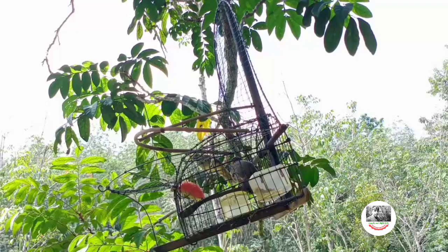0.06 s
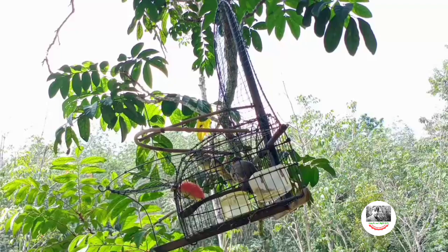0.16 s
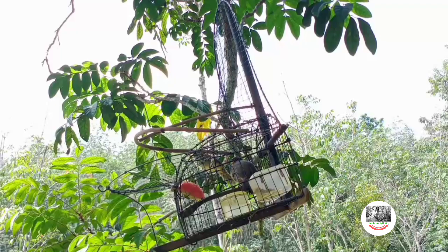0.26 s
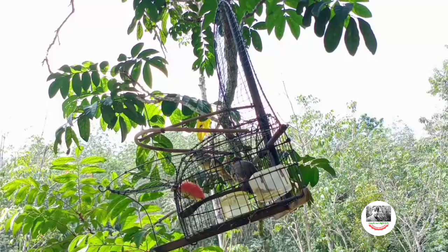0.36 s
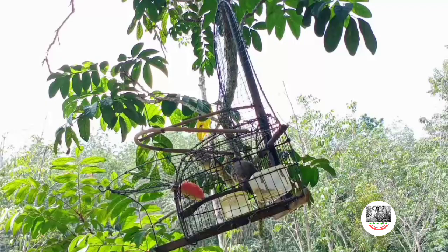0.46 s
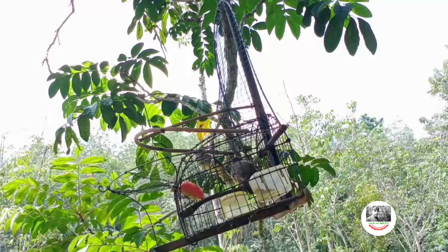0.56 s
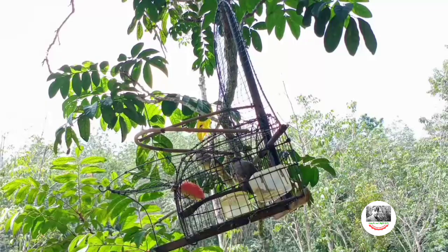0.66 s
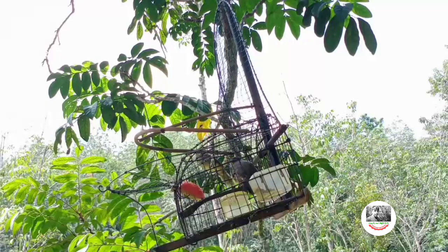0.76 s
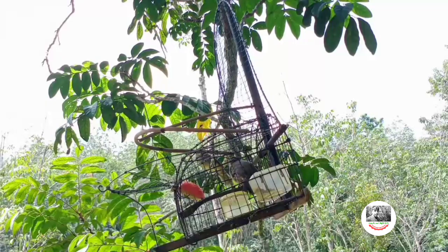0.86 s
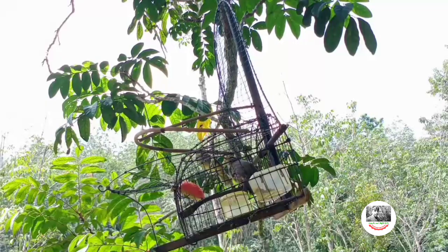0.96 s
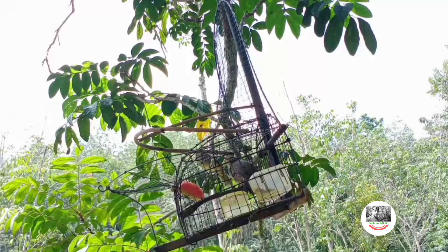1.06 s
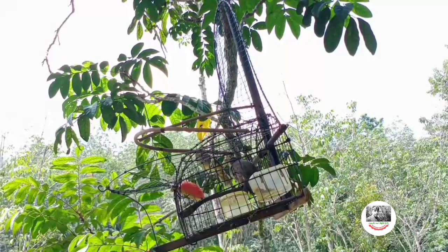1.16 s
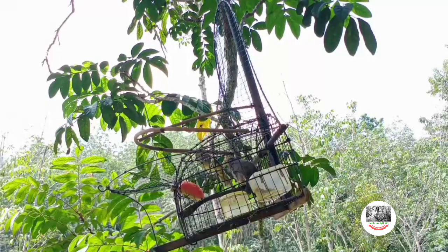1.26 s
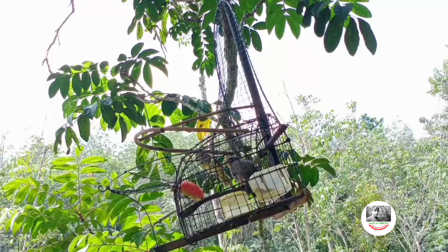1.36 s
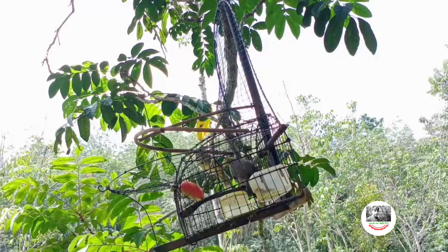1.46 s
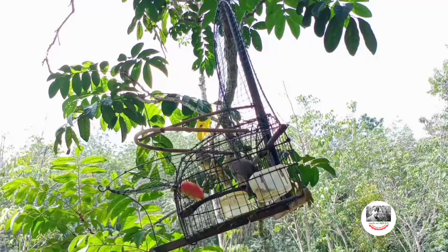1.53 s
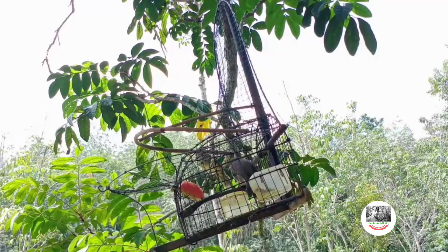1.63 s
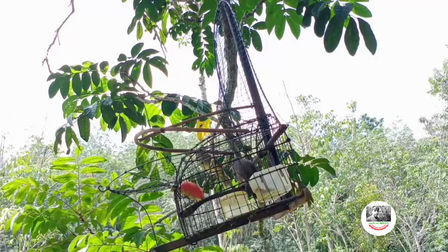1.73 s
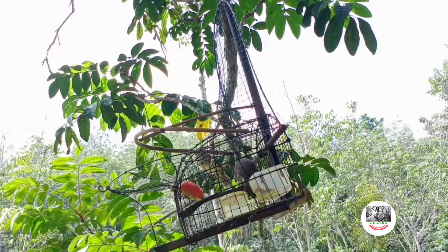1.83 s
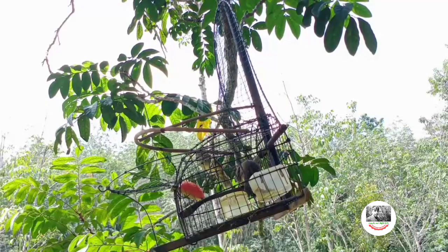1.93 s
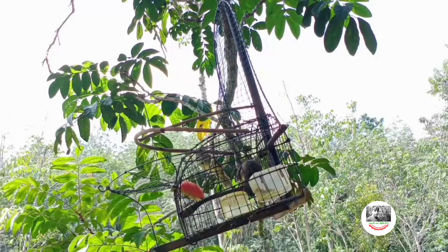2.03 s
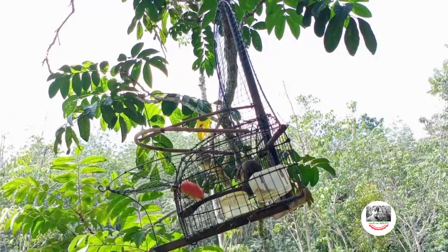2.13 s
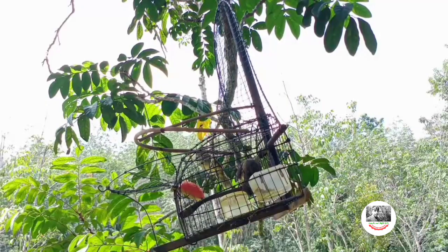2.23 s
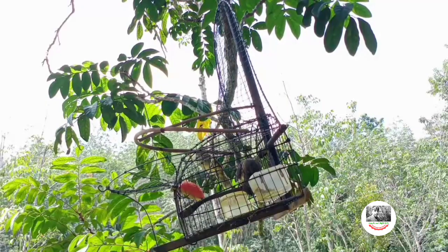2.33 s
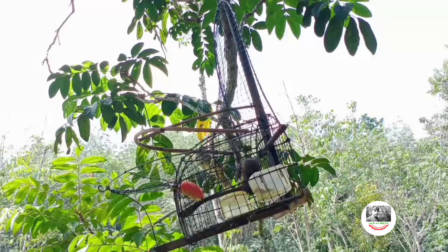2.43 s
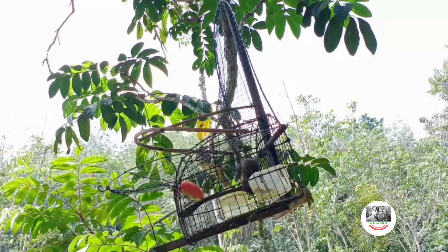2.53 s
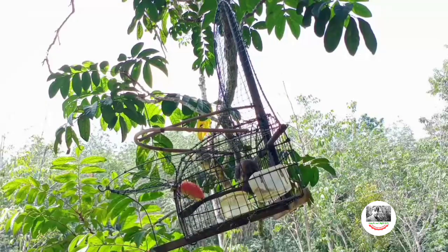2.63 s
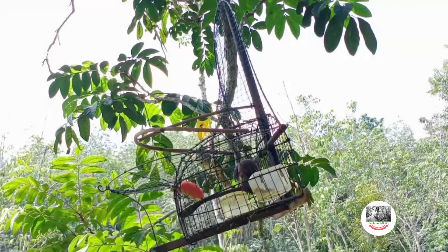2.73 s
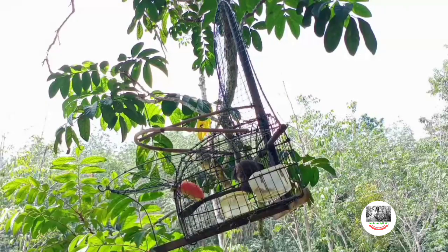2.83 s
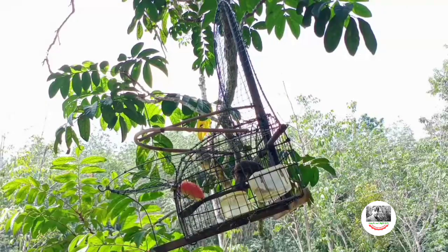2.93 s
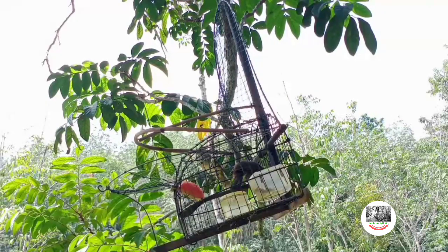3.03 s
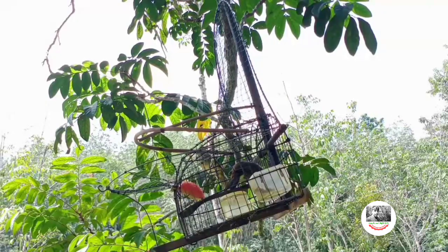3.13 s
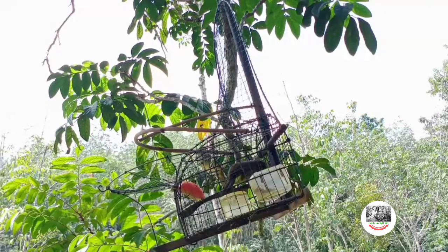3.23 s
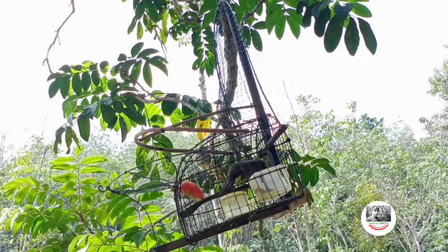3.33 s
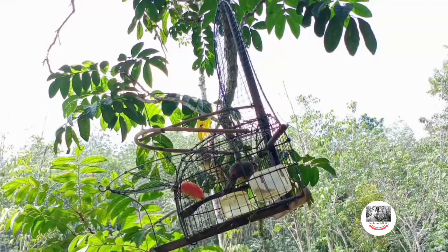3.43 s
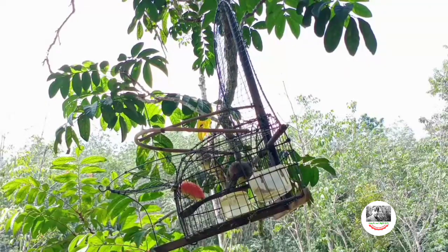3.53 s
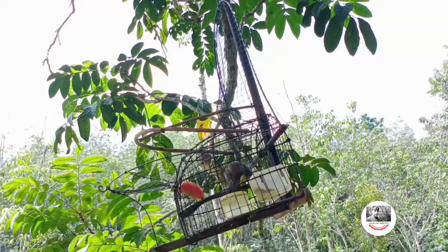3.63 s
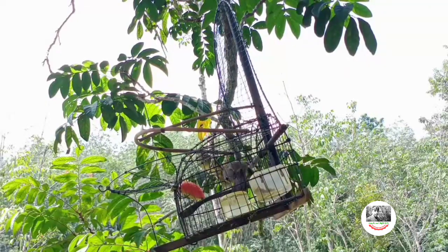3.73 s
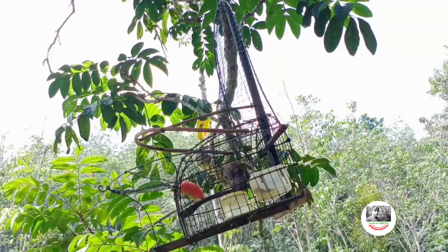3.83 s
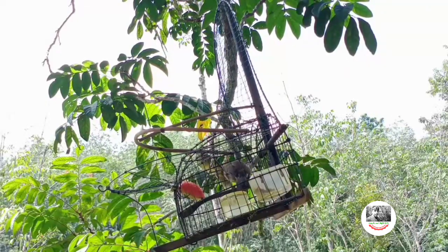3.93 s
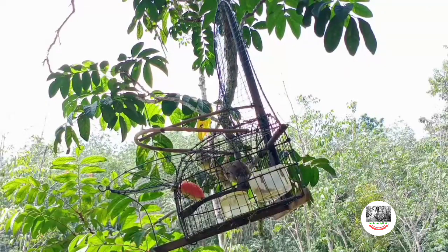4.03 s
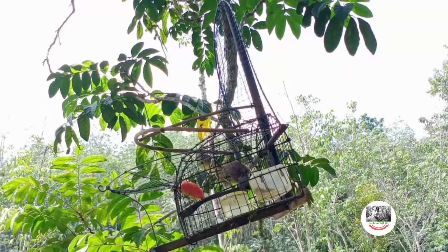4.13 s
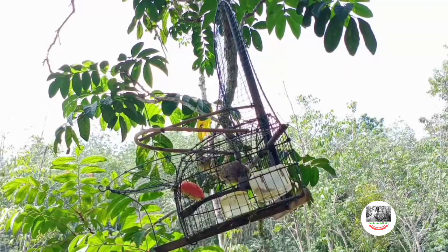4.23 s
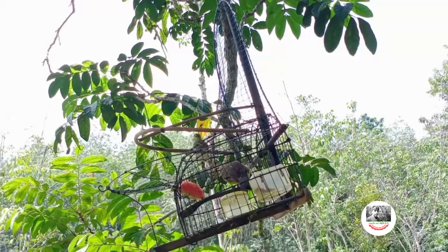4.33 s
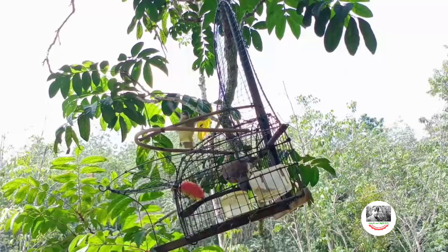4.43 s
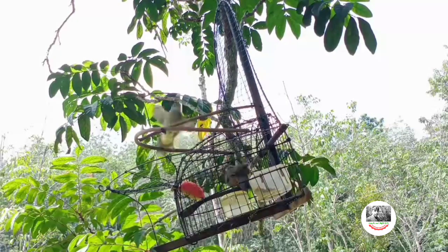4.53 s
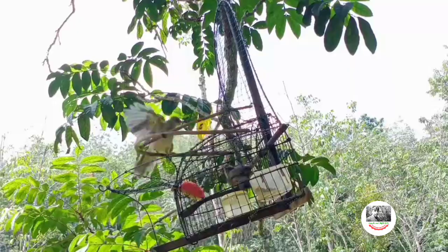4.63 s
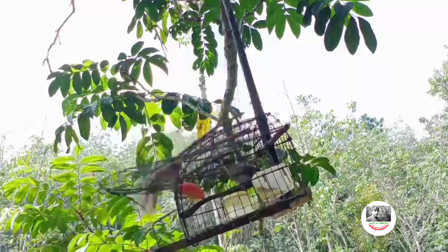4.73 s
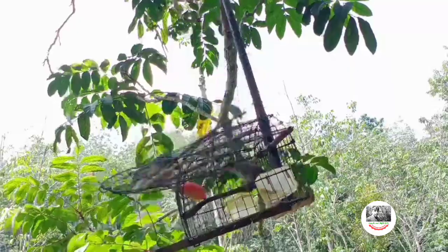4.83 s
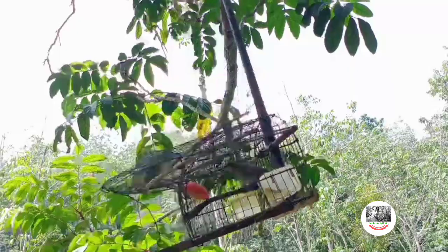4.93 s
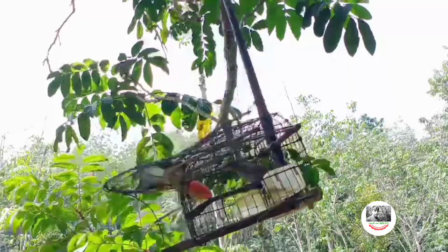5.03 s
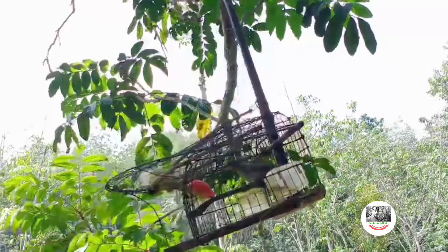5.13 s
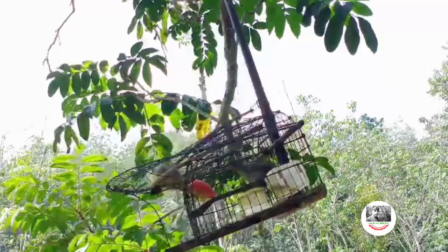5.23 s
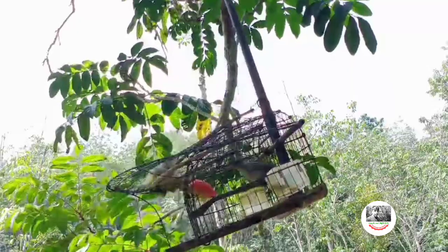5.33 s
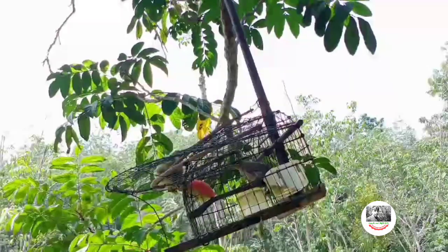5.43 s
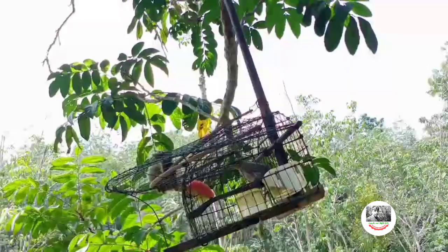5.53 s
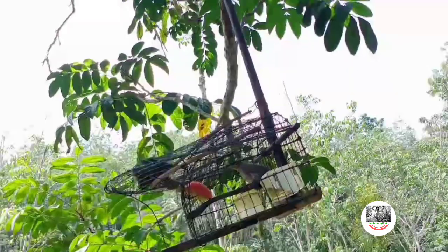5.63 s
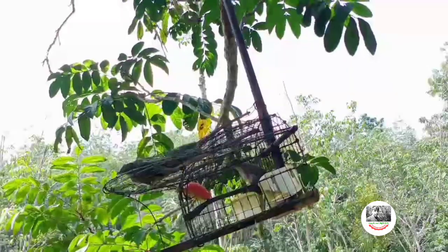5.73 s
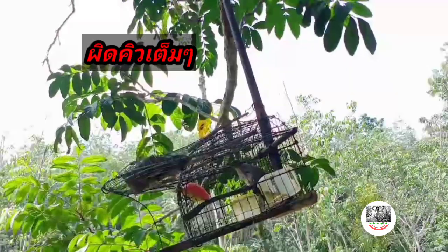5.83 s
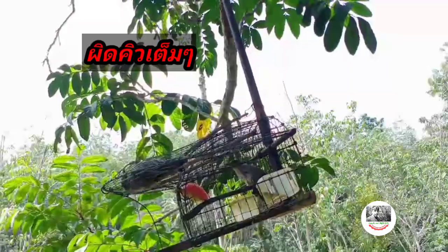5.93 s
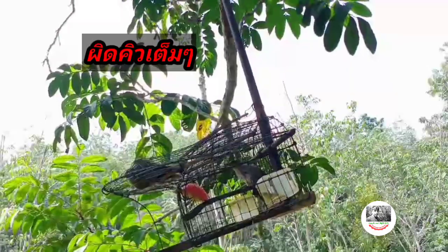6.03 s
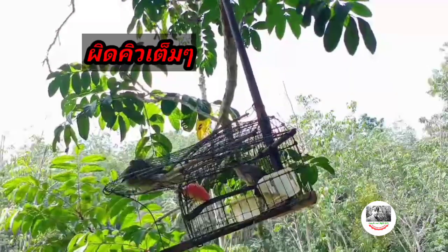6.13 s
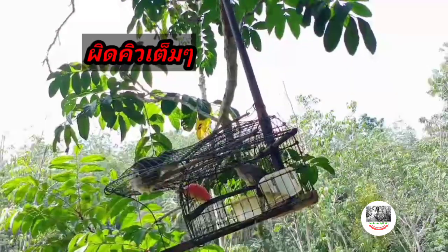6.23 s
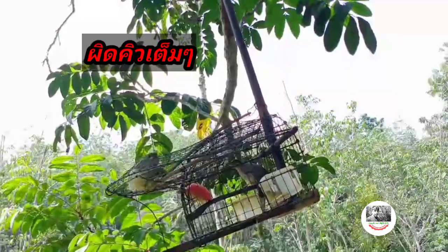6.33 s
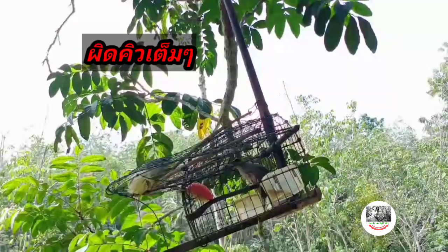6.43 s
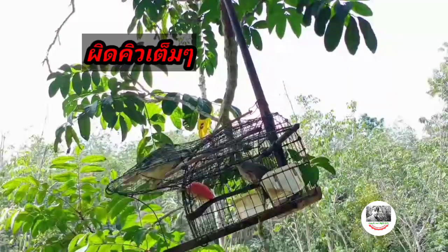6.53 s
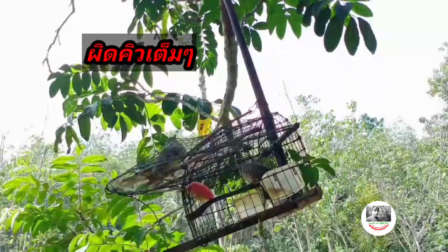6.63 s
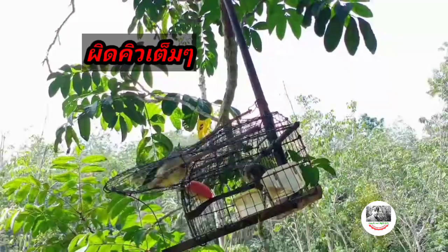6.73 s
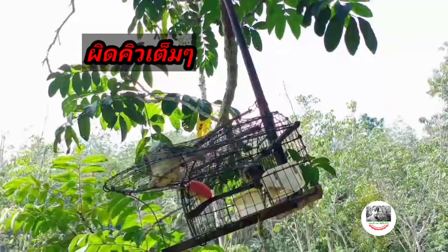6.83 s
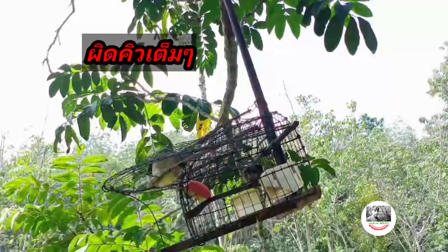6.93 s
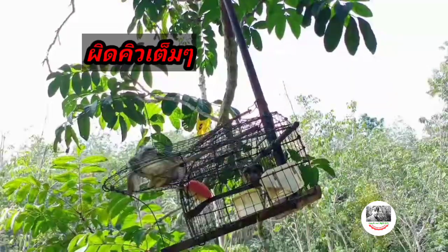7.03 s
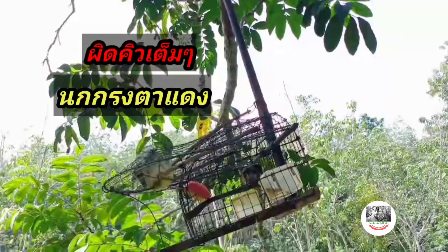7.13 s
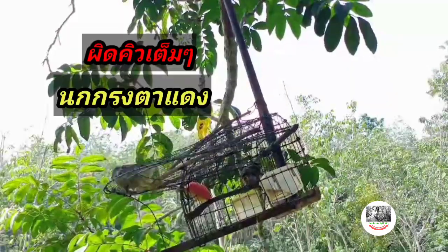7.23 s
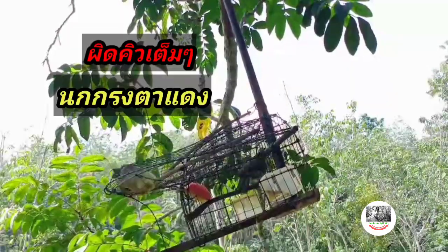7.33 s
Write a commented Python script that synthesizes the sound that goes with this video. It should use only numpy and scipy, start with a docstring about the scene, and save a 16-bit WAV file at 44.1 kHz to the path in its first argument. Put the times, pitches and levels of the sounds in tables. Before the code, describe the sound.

Quiet forest edge with small bird chips and soft whistles, then a sharp metallic trap slam and a captured bird fluttering against wire.

```python
"""A wire cage trap in a tree slams its sprung net shut on a wild bird: decaying modes ring the frame.
The bird flutters in bursts: noisy strokes and short knocks rattle the wires, netting and rods.
Around it, birds whistle and chip as gliding tones, and far calls are swells of band noise.
Behind lies the forest edge: patchy air noise, a low drone and thin insect bands."""
import sys
import numpy as np
from scipy import signal
from scipy.fft import rfft, irfft
from scipy.io import wavfile
from scipy.ndimage import uniform_filter1d

SR = 44100
rng = np.random.default_rng(int(sys.argv[2]) if len(sys.argv) > 2 else 0)


def to_wav(s):
    """Save 16-bit WAV."""
    ch = np.atleast_2d(s).T  # columns
    pcm = np.round(np.clip(ch, -1, 1) * 32767)  # PCM
    wavfile.write(sys.argv[1], SR, pcm.astype(np.int16))


N = 325457
TIME = np.arange(N) / SR

# Blows of the sprung hoop on the cage frame, and its bounces; they also jolt the net.
# Each row: start in seconds, frame ring level in dB, jolt of the net in dB before the cage's own mix.
HOOP_BLOWS = [(4.8287, -18, -14), (4.8502, -27.5, -24.5), (4.873, -42, -20), (4.8912, -28.5, -30),
              (4.919, -40, -32)]


def trap():
    """The hoop slams onto the frame and bounces, each blow setting the frame's modes ringing."""
    out = np.zeros(N)
    for start, ring_db, _ in HOOP_BLOWS:
        add(out, start, amp(ring_db) * frame_ring())
    return out


# Modes the metal frame rings with.
# Each row: frequency in Hz, relative level in dB, time to fall by 60 dB in seconds.
FRAME_MODES = [(345.5, -9.5, 0.13), (1030, -0.5, 0.21), (1117, 2.5, 0.21), (1135, -5, 0.18),
               (1293, -4, 0.24), (1330, -3, 0.33), (1380, 0, 0.21), (1422, -3, 0.24), (1536, 2, 0.19),
               (1630, 0, 0.17), (1806, -11, 0.18), (2090, -6, 0.3), (3180, -13, 0.071), (3053, 0.5, 0.15),
               (3660, -8, 0.25), (7700, -6, .22), (7960, -4.5, 0.31), (8540, -13, 0.19), (8500, -10, 0.25)]


def frame_ring(size=22050):
    """Decaying sine modes of the frame, with new random phases for every ring."""
    t = np.arange(size) / SR
    modes = np.zeros(size)
    for hz, db, t60 in FRAME_MODES:
        decay = np.exp(-np.log(1000) * t / t60)
        modes += amp(db) * decay * np.sin(2 * np.pi * (hz * t + rng.random()))
    return modes / np.sqrt(sum(amp(db) ** 2 for _, db, _ in FRAME_MODES) / 2)


# Colour of the thin wires. Each row: frequency in Hz, relative spectrum level in dB per Hz.
WIRE_COLOUR = [(1000, -39.5), (4000, -15.5), (5200, -19), (6000, -13), (7200, -9.5), (7900, -4),
               (8400, 0.5), (8900, -2), (9600, -8.5), (11000, -14.5), (13000, -20), (15400, -14)]
# Colour of the cage body with its netting. Each row: frequency in Hz, relative spectrum level in dB per Hz.
BODY_COLOUR = [(40, -27), (130, 5), (260, -4.5), (345, 5), (450, -5.5), (780, 1.5), (980, -1.5), (1400, -1),
               (2000, -0.5), (2500, -1.5), (3400, 2), (4200, -4.5), (5200, -20), (9000, -15.5)]


def cage(wire_ring_db=-10, body_ring_db=-9, frame_db=-20.5, rods_db=-7):
    """Strokes and knocks drive the wires and the body, which ring on and stir the frame."""
    wire_force, body_force = stroke_force()
    wires, body = ticks()
    wire_rub = wire_force * contacts(per_s=600, spread_db=3.5, smooth=1.0)
    body_rub = body_force * contacts(per_s=700, spread_db=4.5, smooth=0.55)
    wires = wires + convolve(wire_rub, colour(WIRE_COLOUR))
    body = body + 0.77 * convolve(body_rub, colour(BODY_COLOUR))
    wire_ringing = amp(wire_ring_db) * convolve(wires, tail(t60=0.19))
    body_ringing = amp(body_ring_db) * convolve(body, tail(t60=0.081))
    frame = amp(frame_db) * convolve(body + wires, unit(frame_ring()))
    return wires + body + amp(rods_db) * rods(body_force) + wire_ringing + body_ringing + frame


# Bursts of wingbeats, before the cage's own mix; length 0 is a single flap.
# Each row: first beat in seconds, length in seconds, wire rattle in dB, body rustle in dB.
WING_FLURRIES = [(4.994, 0, -38.5, -44.5), (5.046, .03, -37, -39), (5.124, .035, -39, -39),
                 (5.355, 0, -48, -50.5), (5.432, .055, -47, -47.5), (5.56, .068, -44, -46),
                 (5.741, .095, -43.5, -49), (5.937, 0, -47.5, -48), (6.159, .1, -49, -48.5),
                 (6.352, 0, -43.5, -45), (6.563, .1, -45, -50), (6.731, .053, -39.5, -41),
                 (6.894, 0, -37.5, -42), (6.993, 0.076, -47, -53), (7.146, 0, -37.5, -39),
                 (7.267, 0, -54, -51)]


def stroke_force():
    """How hard wires and body are rubbed: by the swinging net, its jolts, the wingbeats and the feet."""
    # once caught, the bird keeps scrabbling on wires and body
    caught_s, scrabble_db = 4.85, [[-57], [-61.5]]
    power = amp(scrabble_db) ** 2 * (TIME > caught_s)
    # the net swishes as the hoop swings over
    power += amp(-40.5) ** 2 * swell(4.762, rise_s=0.01, fall_s=0.03)

    # jolts die away faster in the wires than in the body
    lag_s, rise_s, wire_fall_s, body_fall_s, body_db = 0.0026, 0.0058, 0.017, 0.021, -6
    for start, _, jolt_db in HOOP_BLOWS:
        power[0] += amp(jolt_db) ** 2 * swell(start + lag_s, rise_s, wire_fall_s)
        power[1] += amp(jolt_db + body_db) ** 2 * swell(start + lag_s, rise_s, body_fall_s)

    beat_s = 0.052  # approximate wingbeat spacing
    for first, length, wire_db, body_db in WING_FLURRIES:
        for beat in np.linspace(first, first + length, 1 + round(length / beat_s)):
            power += amp([[wire_db], [body_db]]) ** 2 * swell(beat, rise_s=0.015, fall_s=0.022)
    return np.sqrt(power)


def swell(peak_s, rise_s, fall_s):
    """Power of a push that grows to its peak and dies away; the times are for its amplitude."""
    return np.exp(-2 * abs(TIME - peak_s) / np.where(TIME < peak_s, rise_s, fall_s))


def contacts(per_s, spread_db, smooth):
    """Feathers and mesh catching on wires: many tiny random slips over a soft hiss."""
    size = amp(spread_db * np.minimum(rng.exponential(1, N), 3)) * rng.choice([-1, 1], N)
    slips = evened(size * (rng.random(N) < per_s / SR))
    return evened(slips + smooth * rng.standard_normal(N))


# The sharpest knocks on the cage, before the lift they all share.
# Each row: start in seconds, bright wire ping in dB, dull knock in dB, knock centre in Hz.
CAGE_KNOCKS = [(4.746, -34, -36, 3050), (4.751, -27.5, -48, 2500), (4.777, -28, -50, 2500),
               (4.7865, -20.5, -47, 2500), (4.7965, -30, -54, 2500), (4.802, -29, -58, 2500),
               (4.809, -29, -28, 1380), (4.822, -28, -21.5, 1500), (4.829, -5.5, -16, 2970),
               (4.8323, -12.5, -20, 1480), (4.8417, -13, -20.5, 1300), (4.85, -19, -19.5, 1300),
               (4.8798, -12.5, -35, 1400), (4.8923, -13, -17.5, 1380), (4.909, -22, -25, 1400),
               (4.9346, -38, -26, 1400), (4.991, -28, -37.5, 2500), (5.106, -26, -42, 3300),
               (5.1437, -33, -35, 1500), (5.1832, -33.5, -44, 1380), (5.257, -39.5, -44, 3020),
               (5.669, -35, -29.5, 3440), (5.743, -47, -40, 2480), (6.1902, -39, -40.5, 3230),
               (6.2539, -27, -30, 3570), (6.311, -56, -43.5, 1350), (6.415, -58, -39.5, 2100),
               (6.714, -40, -36, 1370), (6.753, -39, -36, 1390), (6.78, -34, -43, 2670),
               (6.888, -43, -35.5, 900), (7.046, -36.5, -50, 2500), (7.1448, -25.5, -43, 2900),
               (7.263, -42, -49, 3500), (7.318, -37, -42, 1410)]


def ticks(ping_s=0.002, knock_s=0.0023, lift_db=19, focus=0.56, size=1024):
    """Each knock is a few milliseconds of chatter in the wires and in the struck rod of the body."""
    wires, body = np.zeros((2, N))
    t = np.arange(size) / SR
    wire_click, body_click = colour(WIRE_COLOUR), colour(BODY_COLOUR)
    for start, ping_db, knock_db, hz in CAGE_KNOCKS:
        ping = signal.fftconvolve(rng.standard_normal(size) * np.exp(-t / ping_s), wire_click)
        knock = signal.fftconvolve(rng.standard_normal(size) * np.exp(-t / knock_s), body_click)[:size]
        rod = band(hz, 0.28 * hz, size=size) * (t / knock_s) ** .5 * np.exp(-t / knock_s)
        add(wires, start, amp(ping_db + lift_db) * unit(ping))
        dull = unit(0.52 * unit(knock) + focus * unit(rod))
        add(body, start, amp(knock_db + lift_db) * dull)
    return wires, body


def rods(force, per_s=45, count=5):
    """Loose rods clack at random, each as a short decaying sine, as hard as the body is pushed."""
    t, out = np.arange(1024) / SR, np.zeros(N)
    for hz in np.geomspace(1250, 1680, count):
        clacks = rng.uniform(0.39, 1, N) * (rng.random(N) < per_s / SR)
        rod_ring = unit(np.sin(2 * np.pi * hz * t) * np.exp(-t / 0.0015))
        out += convolve(force * evened(clacks), rod_ring)
    return out / np.sqrt(count)


# Near whistles that glide to a pitch and hold it.
# Each row: start in seconds, length in seconds, from Hz, to Hz, level in dB.
NEAR_WHISTLES = [(0.766, 0.1, 1350, 2275, -54), (1.016, 0.011, 1600, 2480, -55),
                 (1.019, 0.0347, 2260, 1556, -52.5), (1.067, 0.0354, 1010, 1217, -52),
                 (3.803, 0.097, 1465, 2170, -50)]
# How the near whistler's throat and open beak favour its harmonics. Each row: frequency in Hz, gain in dB.
WHISTLER_THROAT = [(1050, -7), (1600, 0), (2200, 2), (3300, -4), (4300, -22)]
# Slurred calls from deeper in the trees, before the mix sets them back.
# Each row: start in seconds, length in seconds, from Hz, to Hz, level in dB, loudest point from 0 to 1.
FAR_SLURS = [(1.756, 0.045, 3600, 3830, -53, .6), (1.785, .225, 3320, 5460, -45.5, 0.51),
             (2.043, 0.036, 3670, 3710, -55, .4), (5.3, .235, 3360, 5850, -45.5, 0.97),
             (6.403, .05, 8350, 7330, -44, .55)]
# A small bird's runs of evenly spaced chips.
# Each row: first chip in seconds, last chip in seconds, number of chips.
CHIP_RUNS = [(.027, .812, 5), (.994, 1.906, 6), (2.103, 4.588, 14), (5.69, 6.59, 5)]


def birds(chip_db=-55.5, slur_ends_db=-9.5):
    """Gliding tones: near whistles arrive almost dry, farther calls trail off among the trees."""
    near, far, chips = np.zeros((3, N))
    for start, length, from_hz, to_hz, db in NEAR_WHISTLES:
        pitch = glide(length, from_hz, to_hz)
        whistle = note(pitch, slope_db=-3, waver=.004, throat=WHISTLER_THROAT, taper=0.44)
        add(near, start, amp(db) * whistle)

    for start, length, from_hz, to_hz, db, loudest in FAR_SLURS:
        u = np.linspace(0, 1, round(length * SR))
        level = amp(db + np.interp(u, [0, loudest, 1], [slur_ends_db, 0, slur_ends_db]))
        pitch = from_hz * (to_hz / from_hz) ** u
        add(far, start, level * note(pitch, slope_db=-16, waver=.016, taper=0.081))

    for first, last, count in CHIP_RUNS:
        for start in np.linspace(first, last, count):
            # each chip drops quickly onto its pitch
            pitch = glide(.018, from_hz=5200, to_hz=4885)
            chip = note(pitch, slope_db=-12, waver=0.019, taper=0.62)
            add(chips, start, chip * amp(chip_db + 0.66 * rng.standard_normal()))

    sent_to_trees = amp(-21) * near + amp(-6.5) * far + amp(-4) * chips
    return near + amp(-5) * far + chips + convolve(sent_to_trees, tail(t60=0.43))


def glide(length, from_hz, to_hz, glide_share=.55):
    """A pitch that slides smoothly to its goal for a share of the note, then stays there."""
    u = np.minimum(np.linspace(0, 1, round(length * SR)) / glide_share, 1)
    return from_hz + (to_hz - from_hz) * np.sin(np.pi / 2 * u) ** 2


def note(hz, slope_db, waver, throat=None, taper=.3, count=3):
    """A wavering whistle; its harmonics fall off evenly, shaped by the throat if one is given."""
    pitch = hz * (1 + waver * band(0, 284, size=len(hz)))
    k = np.arange(1, count + 1)[:, None]
    gains = amp(slope_db * (k - 1) + (read(throat, k * pitch) if throat else 0))
    harmonics = gains * np.sin(2 * np.pi * k * np.cumsum(pitch) / SR)
    tone = harmonics.sum(0) / np.sqrt((gains ** 2).sum(0) / 2)
    return tone * signal.windows.tukey(len(hz), taper)


# Thin far calls smeared by the trees; each fades out over twice its length.
# Each row: start in seconds, length in seconds, centre in Hz, level in dB.
FAR_LISPS = [(1.252, 0.25, 8560, -61), (1.618, 0.51, 5600, -61.5), (2.621, 0.34, 8470, -56.5),
             (3.37, 0.15, 8500, -61), (4.142, 0.29, 8550, -61), (6.446, 0.33, 7900, -55.5),
             (7.188, 0.33, 5870, -62)]
# Runs of far-off twittering.
# Each row: first note in seconds, last note in seconds, number of notes, level in dB.
FAR_TWITTER = [(0.568, .72, 3, -59.5), (0.973, 1.091, 2, -58), (1.806, 2.035, 3, -58),
               (2.912, 3.26, 4, -56.5), (4.469, 4.65, 3, -56.5)]


def lisps():
    """Single thin calls and runs of twittering from the far trees, as swells of band noise."""
    out = np.zeros(N)
    for start, length, hz, db in FAR_LISPS:
        add(out, start, amp(db) * smear(length, hz, width_hz=690))
    for first, last, count, db in FAR_TWITTER:
        for start in np.linspace(first, last, count):
            add(out, start, amp(db) * smear(0.14, 7720, width_hz=1600, rise_share=.17))
    return out


def smear(length, hz, width_hz, rise_share=0.16):
    """A high call so far off that only a quick swell and a blurred tail are left."""
    u = np.arange(round(2 * length * SR)) / (rise_share * length * SR)
    return u * np.exp(1 - u) * band(hz, width_hz, size=len(u))


# Colour of the air at the forest edge. Each row: frequency in Hz, relative spectrum level in dB per Hz.
AIR_COLOUR = [(20, -20), (35, -12), (90, 1.5), (170, -3), (360, -5), (600, -8.5), (1300, -13.5),
              (3000, -17), (4700, -21), (5500, -24), (8500, -19.5), (10200, -29.5), (12500, -34),
              (15400, -33)]
# A low far-off drone and thin insect bands. Each row: centre in Hz, half-width in Hz, level in dB.
STEADY_DRONES = [(225.5, 22, -65), (4760, 500, -70), (6080, 130, -73.5), (6650, 93, -74), (7100, 330, -75)]


def forest(air_db=-53, patchy_db=1.55):
    """Soft air noise in drifting patches of time and pitch, with steady noise bands over it."""
    hz, _, z = signal.stft(rng.standard_normal(N), SR, nperseg=2048, noverlap=1536)
    patches = uniform_filter1d(rng.standard_normal(z.shape), size=14, axis=0)
    patches = evened(uniform_filter1d(patches, size=9, axis=1))
    z = z * amp(read(AIR_COLOUR, hz)[:, None] + patchy_db * patches)
    air = evened(signal.istft(z, nperseg=2048, noverlap=1536)[1][:N])
    drones = sum(amp(db) * band(centre, width) for centre, width, db in STEADY_DRONES)
    return amp(air_db) * air + drones


def amp(db):
    """Decibels to amplitude."""
    return 10 ** (np.asarray(db) / 20)


def evened(x):
    """Scale to an RMS of one."""
    return x / np.sqrt(np.mean(x ** 2) + 1e-20)


def unit(x):
    """Scale to a total energy of one."""
    return x / np.sqrt(np.sum(x ** 2) + 1e-20)


def read(points, hz):
    """Read a curve between its points along a log frequency axis."""
    f, value = np.transpose(points)
    return np.interp(np.log(hz + 1), np.log(f + 1), value)


def add(mix, start_s, sound):
    """Lay a sound into the mix, cut off at the end."""
    part = mix[round(start_s * SR):][:len(sound)]
    part += sound[:len(part)]


def convolve(x, response):
    """Let x excite a response, cut to the scene's length."""
    return signal.oaconvolve(x, response)[:N]


def band(hz, width, size=N):
    """Noise in one bell-shaped band."""
    f = np.fft.rfftfreq(size, 1 / SR)
    bell = np.exp(-((f - hz) / width) ** 2 * 2)
    return evened(irfft(rfft(rng.standard_normal(size)) * bell, size))


def colour(points, size=2048):
    """The causal, minimum-phase click that has a given spectrum."""
    log_gain = np.log(amp(read(points, abs(np.fft.fftfreq(size, 1 / SR)))))
    spectrum = np.exp(np.conj(signal.hilbert(log_gain)))
    return unit(np.fft.ifft(spectrum).real[:size // 2])


def tail(t60, size=22050):
    """Dense random ringing that falls by 60 dB in t60 seconds."""
    t = np.arange(size) / SR
    return unit(rng.standard_normal(size) * np.exp(-np.log(1000) * t / t60))


def scene():
    """The trap and its caught bird, the other birds and the forest edge, in mono."""
    return (trap() + cage() + birds() + lisps() + forest())[None]


def record(dry):
    """The loudest peaks are rounded off below a ceiling, then the top of the treble is cut."""
    ceiling, edge_hz = .85, 15600
    rounded = dry / (1 + (dry / ceiling) ** 4) ** .25
    lowpass = signal.firwin(511, edge_hz, window=("kaiser", 9), fs=SR)
    return signal.oaconvolve(rounded, lowpass[None], "same")


dry = scene()
out = record(dry)
to_wav(out)
```